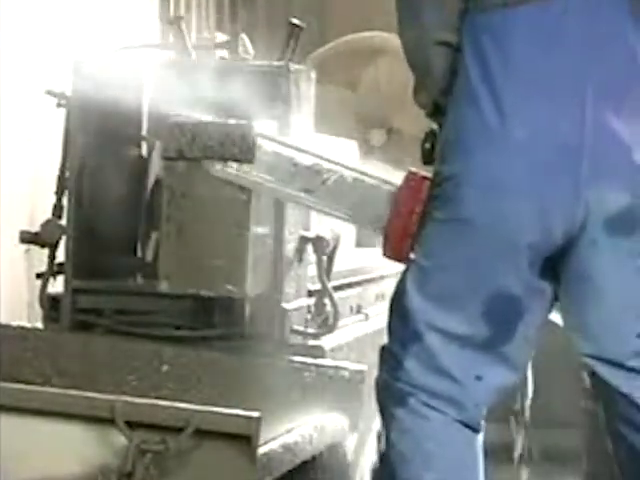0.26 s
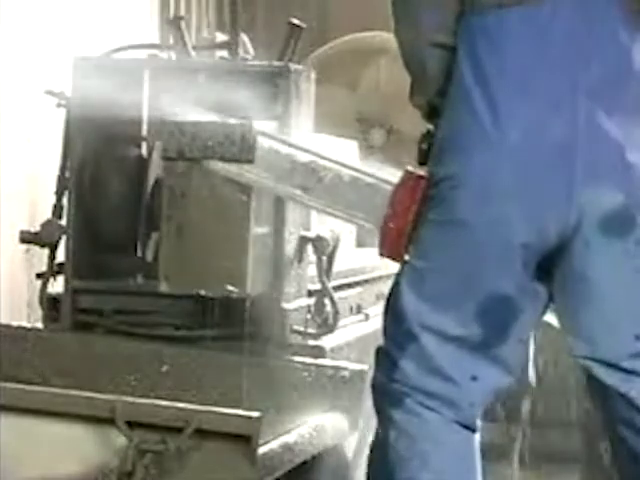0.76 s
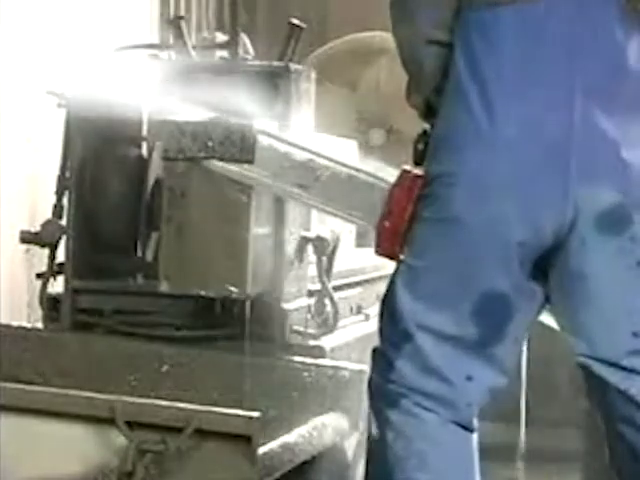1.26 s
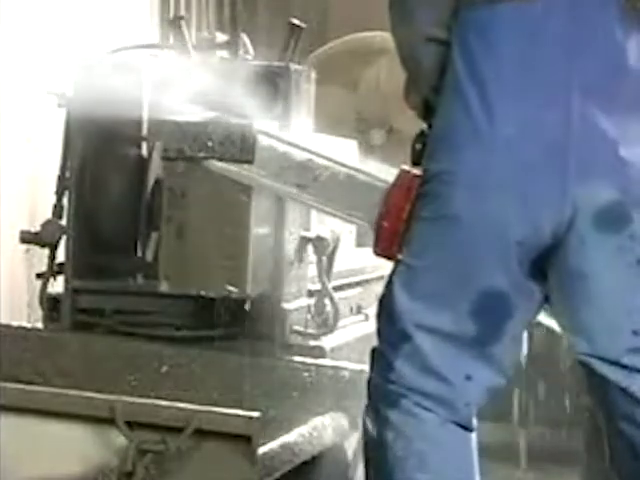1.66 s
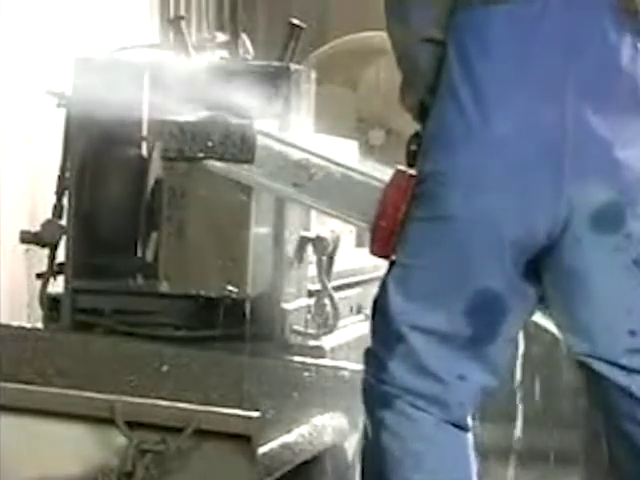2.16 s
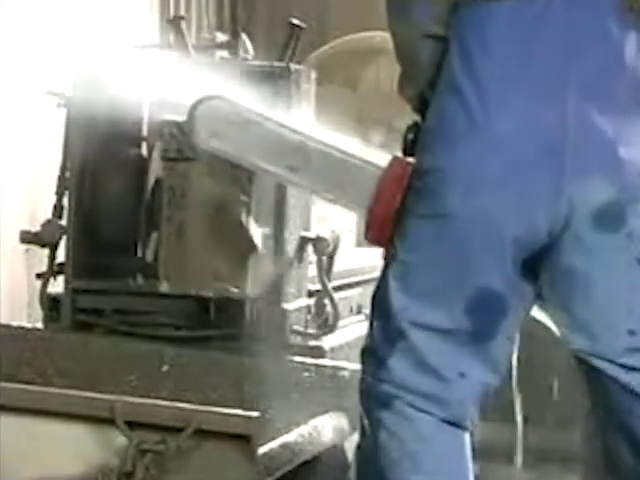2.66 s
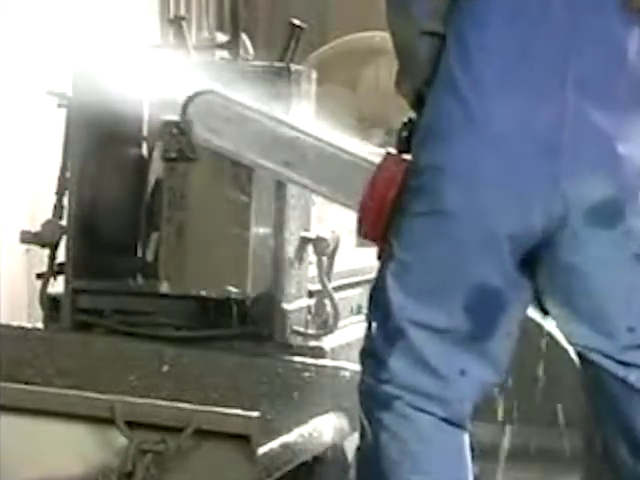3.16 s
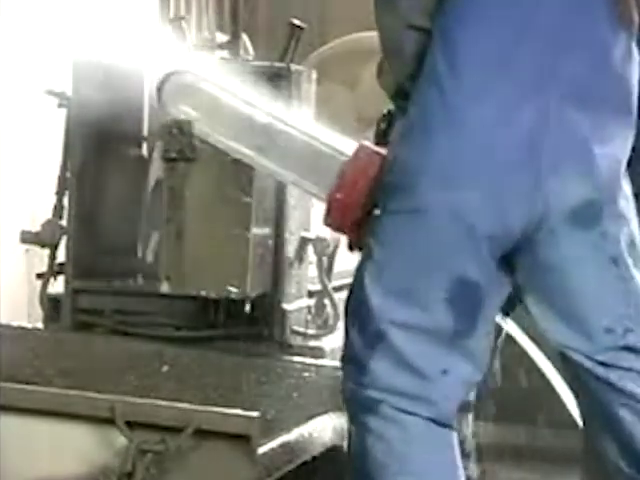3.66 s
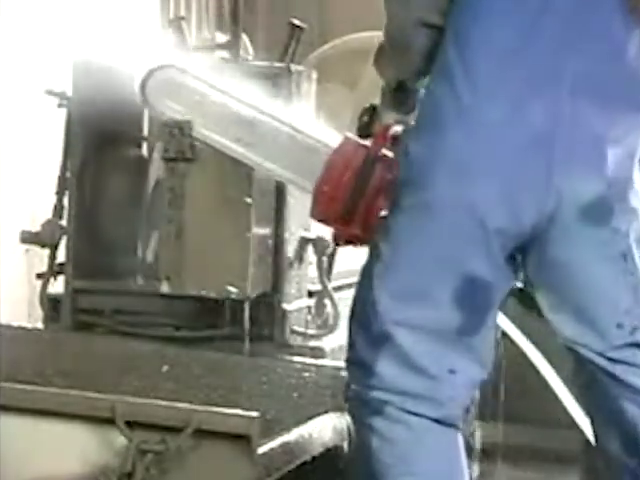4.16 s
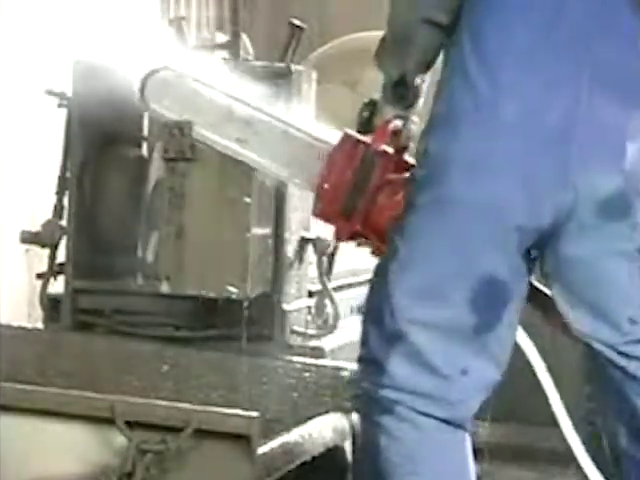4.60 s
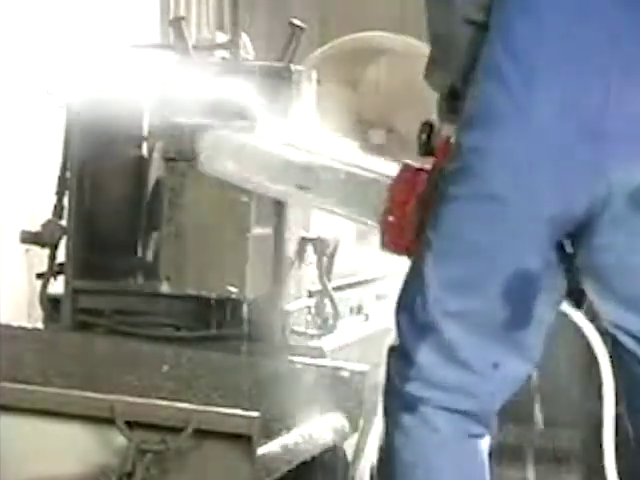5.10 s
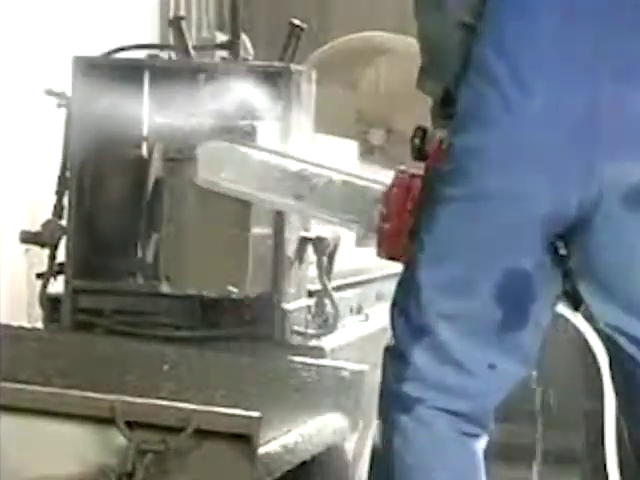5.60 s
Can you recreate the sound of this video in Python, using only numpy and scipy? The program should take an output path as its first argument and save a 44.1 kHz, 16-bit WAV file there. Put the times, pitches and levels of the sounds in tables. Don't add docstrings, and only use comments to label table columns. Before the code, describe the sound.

A loud, steady wall of abrasive saw noise and spray hiss, with the steel bar ringing in brief spells and loose chain links rattling. The vane motor's rough whine dips early and slides upward. Mid-way, knocks and a dull thud follow a falling offcut. Afterwards, faint free whines surface above the cut. Close, coarse, nearly mono camcorder sound with a weak engine drone.

```python
import sys
import numpy as np
from scipy import signal
from scipy.fft import rfft, irfft, dct
from scipy.io import wavfile
from scipy.ndimage import uniform_filter1d

SR = 44100
rng = np.random.default_rng(int(sys.argv[2]) if len(sys.argv) > 2 else 0)


def unload_audio(sound):
    columns = np.transpose(np.atleast_2d(sound))
    steps = np.round(np.clip(columns, -1, 1) * 32767)
    wavfile.write(sys.argv[1], SR, steps.astype(np.int16))


def convert_level_to_amplitude(level_db):
    exponent = np.asarray(level_db, float) / 20
    return 10 ** exponent


N = 257544
TIME = np.arange(N) / SR


def curves(table):
    s, *columns = np.transpose(table)
    return [np.interp(TIME, s, c) for c in columns]


def unit(x):
    return x / np.sqrt(np.mean(x ** 2))


def swell(middle, length):
    return np.exp(-4 * ((TIME - middle) / length) ** 2)


def swells(table):
    return sum(db * swell(s, length) for s, length, db in table)


def window(start, end, edge):
    return np.sin(np.pi / 2 * np.clip(np.minimum(TIME - start, end - TIME) / edge + .5, 0, 1))


def walk(rate):
    hold = max(int(SR / rate), 1)
    steps = np.repeat(rng.standard_normal(N // hold + 1), hold)[:N]
    return unit(uniform_filter1d(uniform_filter1d(steps, hold), hold))


def coloured(points, flicker_db, rate):
    hz = np.maximum(np.arange(N // 2 + 1) * SR / N, 1)
    corner_hz, corner_db = np.transpose(points)
    shape_db = np.interp(np.log(hz), np.log(corner_hz), corner_db, -120, -120)
    noise = rfft(rng.standard_normal(N)) * convert_level_to_amplitude(shape_db)
    place = 3 * np.log2(hz)
    out = np.zeros(N)
    for k in range(int(3 * np.log2(corner_hz[0])), int(3 * np.log2(corner_hz[-1])) + 2):
        third_octave = np.clip(1 - abs(place - k), 0, 1)
        out += convert_level_to_amplitude(flicker_db * walk(rate)) * irfft(noise * third_octave, N)
    return unit(out)


def shifting_modes(x, depth_db):
    _, _, z = signal.stft(x, SR, nperseg=2048)
    field = uniform_filter1d(rng.standard_normal(z.shape), size=4, axis=0)
    field = uniform_filter1d(field, size=14, axis=1)
    return unit(signal.istft(z * convert_level_to_amplitude(depth_db * unit(field)), SR, nperseg=2048)[1][:N])


def rough_tone(hz, rough, rate):
    wobble = np.sqrt(1 - rough) + np.sqrt(rough / 2) * (walk(rate) + 1j * walk(rate))
    return np.sqrt(2) * np.real(wobble * np.exp(2j * np.pi * np.cumsum(hz) / SR))


# time in seconds, level in dB.
PRESSURE = [(0, 1), (.25, -1.5), (.8, 0.35), (1.1, -.5), (2.2, 0.84), (2.8, -1), (3.4, 0), (5.0, 0),
            (5.84, -0.35)]


def push_db():
    return curves(PRESSURE)[0]


# frequency in Hz, density in dB per Hz.
GRIND_COLOUR = [(1500, -16), (1700, -7.5), (2300, -2.5), (3100, -3.5), (3700, -1.5), (4600, -2), (5300, -2),
                (6000, -8), (7000, -24.5)]


def grind(push):
    noise = coloured(GRIND_COLOUR, flicker_db=.5, rate=6)
    return convert_level_to_amplitude(-21 + push) * shifting_modes(noise, depth_db=2.14)


# frequency in Hz, density in dB per Hz.
HISS_COLOUR = [(4400, -21), (5200, -10.5), (6000, -1.5), (8170, -2), (9800, -4.5), (11100, -9.5),
               (13100, -8.5), (14200, -10.5), (14700, -12), (15150, -16)]


def exhaust_hiss(push):
    hiss_db = -20.5 + 0.22 * TIME + .8 * push
    noise = coloured(HISS_COLOUR, flicker_db=0.52, rate=6)
    return convert_level_to_amplitude(hiss_db) * shifting_modes(noise, depth_db=1.1)


# frequency in Hz, width in Hz, resting level in dB.
RINGS = [
    (2728, 170, -42.5),
    (7000, 240, -43),
    (1913, 50, -53.5),
    (1782, 62, -54),
    (3720, 250, -45),
    (4695, 400, -43.5),
]
# middle in seconds, length in seconds, rise in dB.
RING_SPELLS = [
    [(.05, 0.37, 13), (1.4, 1.4, 10.5), (2.8, .4, 8), (3.6, .5, 8.5), (5.8, 0.38, 13)],
    [(.95, 0.87, 11), (1.7, .9, 12), (3.1, 0.57, 12), (5.0, .4, 10)],
    [(5.0, .4, 22)],
    [(3.1, 0.5, 17), (5.4, 0.64, 23.5)],
    [(.5, .5, 11), (2.4, 0.78, 11), (5.8, 0.34, 6.5)],
    [(0.091, .5, 10.5), (2.8, 0.6, 17), (3.5, .5, 4), (4.4, 0.83, 7)],
]


def bar_rings():
    out = np.zeros(N)
    for (hz, width, rest_db), spells in zip(RINGS, RING_SPELLS):
        b, a = signal.iirpeak(hz, hz / width, SR)
        ring = signal.lfilter(b, a, signal.lfilter(b, a, rng.standard_normal(N)))
        out += convert_level_to_amplitude(rest_db + swells(spells)) * unit(ring)
    return out


# middle in seconds, length in seconds, clatter rise in dB, rumble rise in dB.
KNOCKS = [
    (0.164, .05, -1, 2),
    (.8, 0.42, 4.5, 1),
    (2.894, 0.26, 3.5, 2),
    (3.006, 0.12, 3, 2),
    (3.386, .08, 2.5, 8.5),
    (3.62, 0.054, -1, 6),
    (4.91, .06, -0.5, 4),
]


def knock_db():
    clatter_db = swells([(s, length, db) for s, length, db, _ in KNOCKS])
    rumble_db = swells([(s, length, db) for s, length, _, db in KNOCKS])
    return clatter_db, rumble_db


# frequency in Hz, density in dB per Hz.
CLATTER_COLOUR = [(740, -10.5), (850, -11.5), (950, -1), (1100, 2.5), (1350, -0.5), (1700, 1), (1900, -23)]


def chain_clatter(knocks):
    return convert_level_to_amplitude(-34.5 - 0.1 * TIME + knocks) * coloured(CLATTER_COLOUR, flicker_db=0.54, rate=10)


# frequency in Hz, density in dB per Hz.
RUMBLE_COLOUR = [(15, -34), (28, -11), (45, -3), (110, 2.5), (170, -6), (230, -4.5), (290, -8.5),
                 (345, -14)]


def shop_rumble(knocks):
    return convert_level_to_amplitude(-38.5 + knocks) * coloured(RUMBLE_COLOUR, flicker_db=1.0, rate=5.7)


def cutting():
    push = push_db()
    clatter_knocks, rumble_knocks = knock_db()
    out = grind(push) + exhaust_hiss(push) + bar_rings()
    out += chain_clatter(clatter_knocks) + shop_rumble(rumble_knocks)
    return out * convert_level_to_amplitude(0.3 * walk(11))


# time in seconds, vane rate in Hz, air load in dB.
MOTOR = [(0, 465, -7), (.1, 467.3, 3), (.38, 471, -1.5), (.47, 457, -1.5), (.6, 427.6, -2),
         (.75, 386.7, -2), (.95, 450.6, 0), (1.1, 498, 0.5), (1.48, 512.4, -3.5), (1.77, 579, 0.5),
         (2.08, 532.7, -1.5), (2.35, 457.2, 0), (2.68, 515, -3), (2.82, 546, 0), (2.95, 543.6, -13.5),
         (3.5, 543.3, -12.5), (4.3, 552.6, -16.5), (5.84, 545, -13)]
# middle in seconds, length in seconds, rise in dB.
FREE_SPELLS = [
    (3.5, .35, 13),
    (4.25, .4, 11),
    (5.7, .35, 12),
]


def motor_whine():
    hz, load_db = curves(MOTOR)
    free = window(2.9, N / SR + 1, 0.27)
    hz = hz + free * 5 * walk(4)
    load_db = load_db + free * 2 * walk(7)
    muffler_hz, muffler_width_hz = 972, 110
    muffler = 1 / np.sqrt(1 + (2 * (2 * hz - muffler_hz) / muffler_width_hz) ** 2)
    slide_hz_per_s = abs(uniform_filter1d(np.gradient(hz) * SR, size=4000))
    rough = np.clip(.2 + slide_hz_per_s / 380 + .05 * free, 0, .85)
    second = convert_level_to_amplitude(-25 + swells(FREE_SPELLS)) * muffler * rough_tone(2 * hz, rough, rate=75)
    third = convert_level_to_amplitude(-41 + 3.5 * walk(5)) * rough_tone(3 * hz, rough=0.46, rate=55)
    return convert_level_to_amplitude(load_db) * (second + third)


# start in seconds, end in seconds, level in dB.
FUNDAMENTAL = [
    (0.429, 1.07, -42.5),
    (2.36, 2.56, -43.5),
]


def vane_fundamental():
    gain = sum(convert_level_to_amplitude(db) * window(start, end, .04) for start, end, db in FUNDAMENTAL)
    return gain * rough_tone(curves(MOTOR)[0], rough=.7, rate=68)


# time in seconds, firing rate in Hz, level in dB.
ENGINE = [(0, 66.4, -29), (.08, 73.2, -30.5), (.78, 74.6, -32.5), (2.9, 74.9, -33), (3.3, 74.95, -34.5),
          (3.61, 72, -36.5), (4.1, 72, -34), (4.33, 70.6, -33.5), (5.4, 71, -38), (5.64, 69.25, -33.5),
          (5.84, 69.2, -36.5)]
# multiple of the firing rate, level in dB.
ENGINE_PARTIALS = [
    (1, 1),
    (2, -11.5),
    (3, -15.5),
    (4, -24),
]
# middle in seconds, length in seconds, change in dB.
FALTERS = [
    (4.456, .12, -6.5),
    (4.677, .28, -17),
    (5.404, .22, -11.5),
]


def compressor_engine():
    hz, db = curves(ENGINE)
    drone = sum(convert_level_to_amplitude(d) * rough_tone(k * hz, rough=0.12 * k, rate=8) for k, d in ENGINE_PARTIALS)
    return convert_level_to_amplitude(db + swells(FALTERS)) * drone


def arch(hop):
    return np.sin(np.pi / 2 * np.sin(np.pi * (np.arange(2 * hop) + .5) / (2 * hop)) ** 2)


def unfold(lines, shape, lead):
    u, v = np.split(dct(lines, type=4, norm="ortho"), 2, axis=1)
    frames = np.c_[v, -v[:, ::-1], -u[:, ::-1], -u] * shape
    first, second = np.split(frames, 2, axis=1)
    return (first[1:] + second[:-1]).ravel()[lead:][:N]


VANE_BLIPS = [.207, 1.322, 1.461, 2.251, 2.854, 3.597]
RUMBLE_BLIPS = [1.275, 1.833, 1.879, 2.297, 2.947, 3.133, 3.46, 3.55, 5.64]
CLATTER_BLIPS = [1.6, 2.39, 2.761, 2.854, 2.947, 2.994, 3.04, 3.412, 4.758]
OFFCUT_BLIPS = [
    2.901,
    2.901,
    3.04,
]


def blips():
    out = [(s, np.interp(s, *np.transpose(MOTOR)[:2])) for s in VANE_BLIPS]
    for times, hz in [(RUMBLE_BLIPS, 355), (CLATTER_BLIPS, 805), (OFFCUT_BLIPS, 398)]:
        out += [(s, hz * (1 + .03 * rng.standard_normal())) for s in times]
    return out


# time in seconds, change in dB.
STEP_TRIM = [(0, -.8), (1.1, -.8), (1.2, .1), (2.6, .1), (2.7, -.8), (3.3, -.8), (3.4, .1)]


def camcorder_steps(x):
    hop, lead, top_hz = 2048, 3149, 15140
    padded = np.r_[np.zeros(lead), x, np.zeros(3 * hop)]
    frames = np.lib.stride_tricks.sliding_window_view(padded, 2 * hop)[::hop] * arch(hop)
    middle_s = ((np.arange(len(frames)) + 1) * hop - lead) / SR
    step = convert_level_to_amplitude(-14 + np.interp(middle_s, *np.transpose(STEP_TRIM)))[:, None]
    a, b, c, d = np.split(frames, 4, axis=1)
    folded = np.c_[-c[:, ::-1] - d, a - b[:, ::-1]]
    lines = np.round(dct(folded, type=4, norm="ortho") / step)
    lines[:, int(top_hz * 2 * hop / SR):] = 0
    for s, hz in blips():
        lines[np.argmin(abs(middle_s - s)), int(hz * 2 * hop / SR)] = 1
    return unfold(lines * step, arch(hop), lead - hop)


# time in seconds, middle in Hz, width in octaves.
STEREO_FLECKS = [(.052, 4650, .3), (.098, 7000, .25), (.123, 10300, .2), (.495, 12100, .25),
                 (.705, 12400, .16), (1.334, 11700, .17), (1.635, 5700, .3), (1.981, 4650, .3),
                 (2.422, 5600, .6), (2.726, 7600, .9), (3.258, 4700, .3), (3.259, 8700, .5),
                 (3.653, 5700, .3), (3.91, 6800, .7), (4.003, 6100, .8), (4.139, 14000, .2),
                 (4.14, 8300, .26), (4.374, 6300, .26), (4.745, 12700, .24), (5.467, 11700, .17),
                 (5.577, 11000, .18), (5.581, 4900, .44)]


def stereo_flecks():
    hop, lead = 1024, 667
    lines = np.zeros((N // hop + 4, hop))
    hz = np.arange(hop) * SR / (2 * hop)
    for s, middle_hz, octaves in STEREO_FLECKS:
        band = abs(np.log2((hz + 1) / middle_hz)) < octaves / 2
        db = -23 + 10 * np.log10(octaves) - 5 * max(np.log2(middle_hz / 7500), 0)
        noise = np.sqrt(hop / band.sum()) * band * rng.standard_normal(hop)
        lines[round((s * SR + lead) / hop)] += convert_level_to_amplitude(db) * noise
    return unfold(lines, arch(hop), lead)


def scene():
    mono = camcorder_steps(cutting() + motor_whine() + vane_fundamental() + compressor_engine())
    side = stereo_flecks()
    return np.array([mono + side, mono - side])


def low_pass(x):
    return signal.sosfilt(signal.butter(12, 15340, fs=SR, output="sos"), x)


def record(dry):
    return low_pass(dry)


dry = scene()
out = record(dry)
unload_audio(out)
```